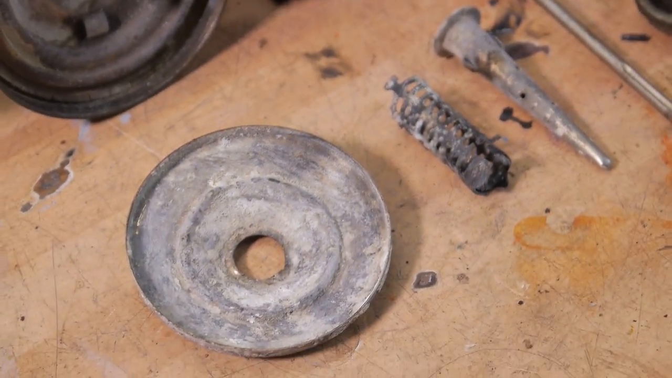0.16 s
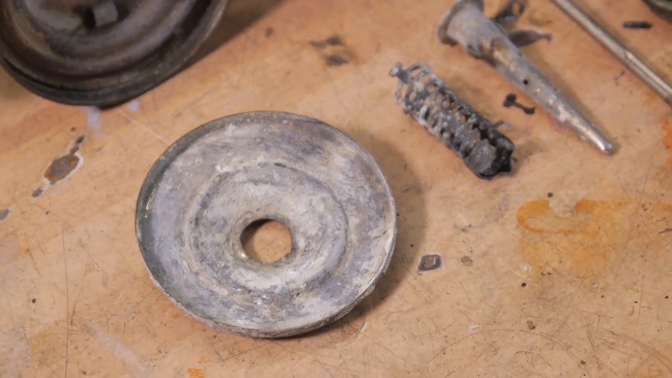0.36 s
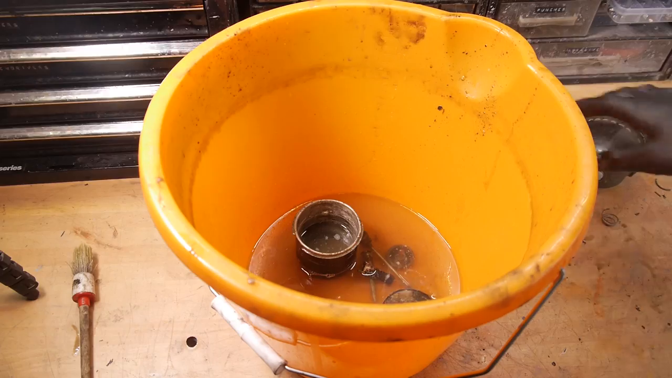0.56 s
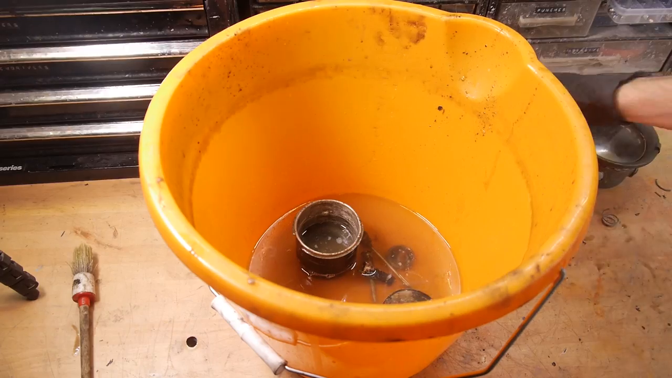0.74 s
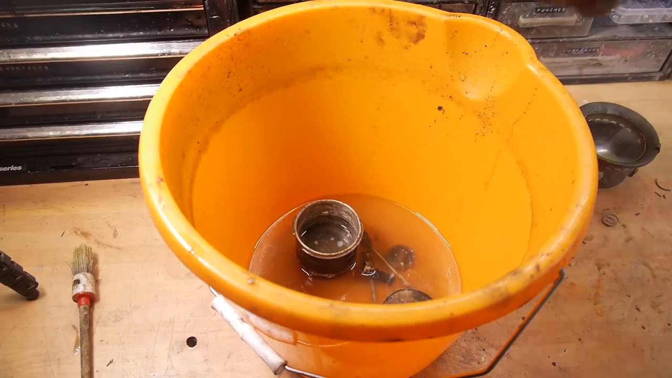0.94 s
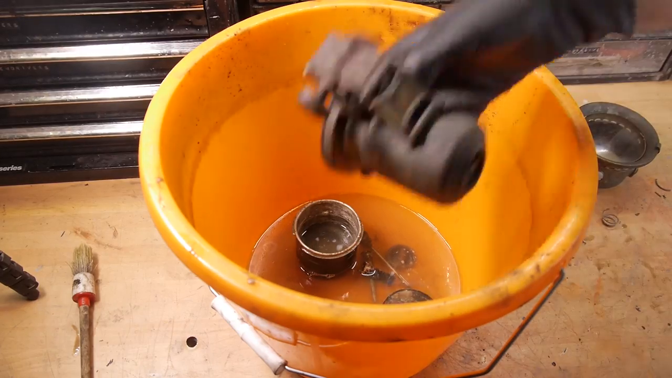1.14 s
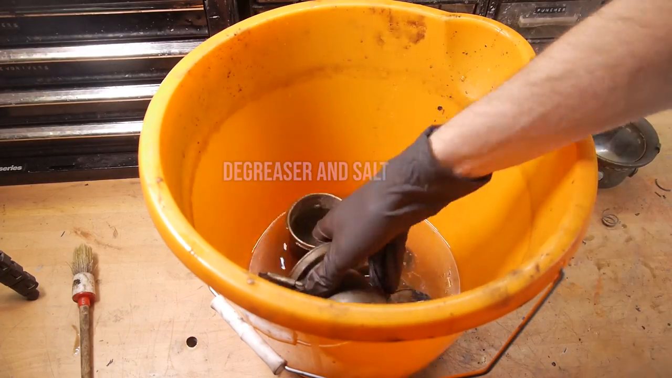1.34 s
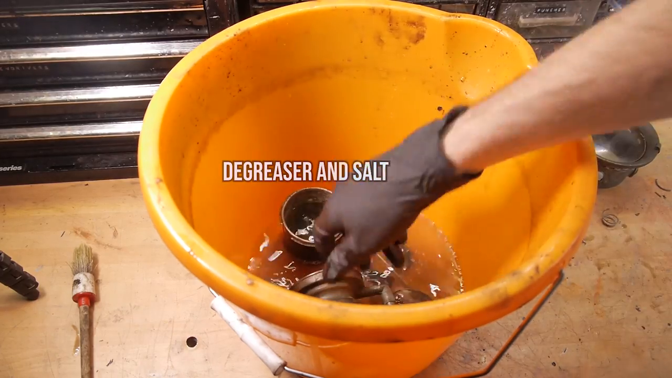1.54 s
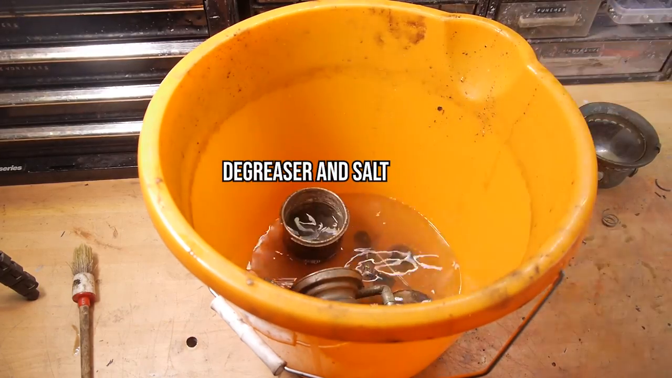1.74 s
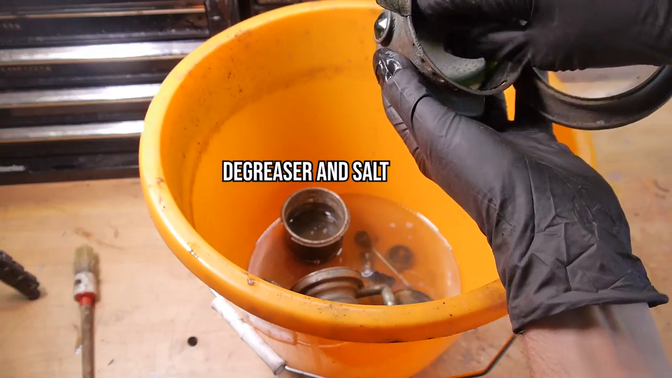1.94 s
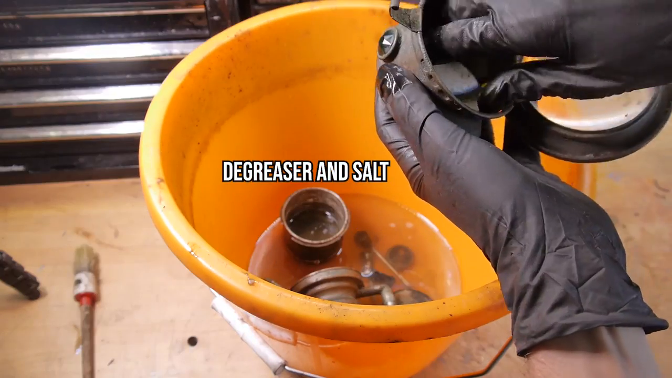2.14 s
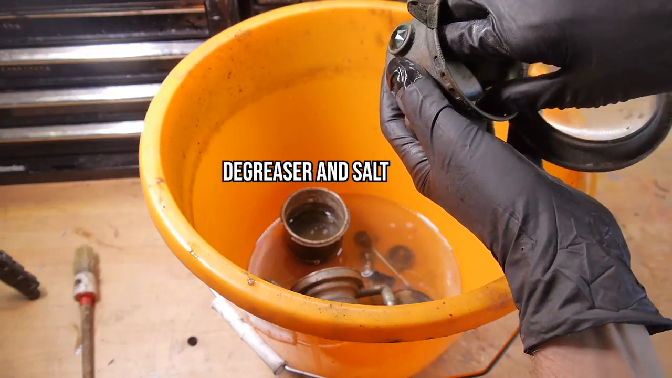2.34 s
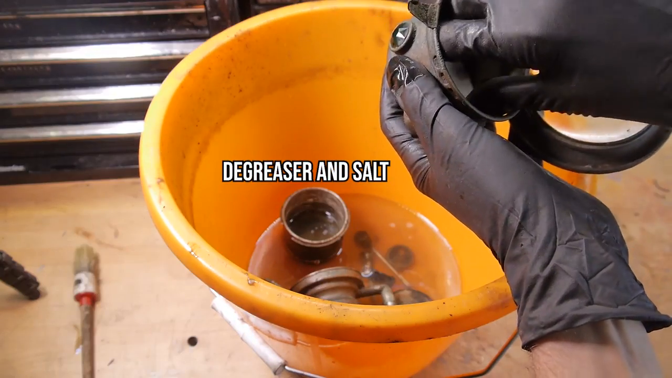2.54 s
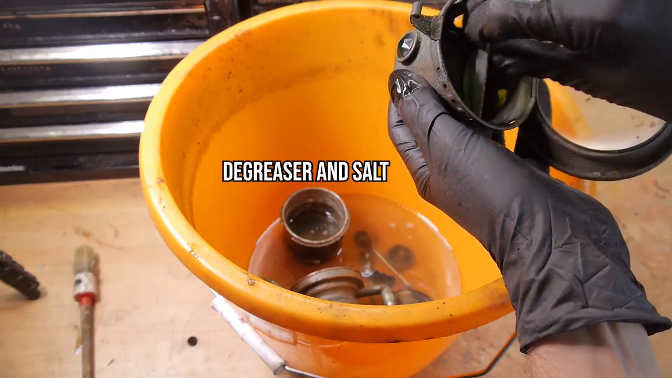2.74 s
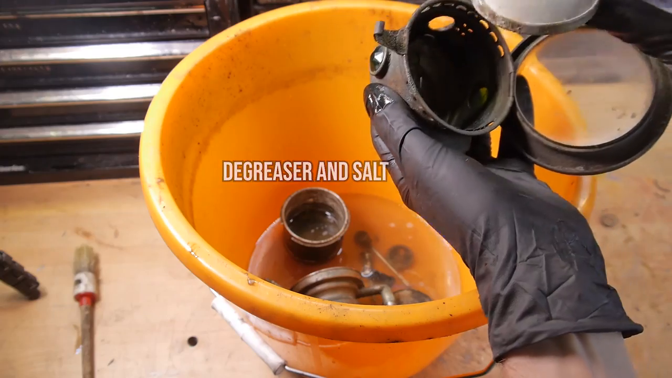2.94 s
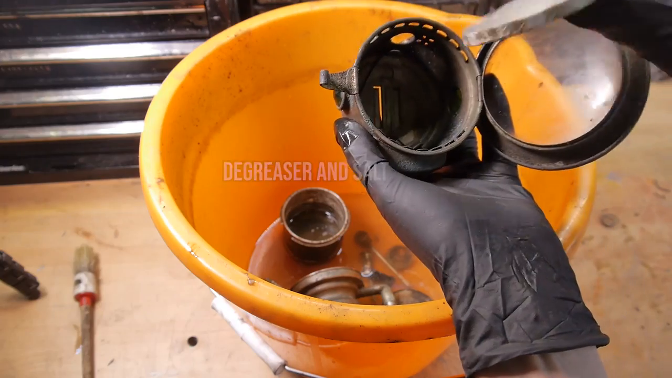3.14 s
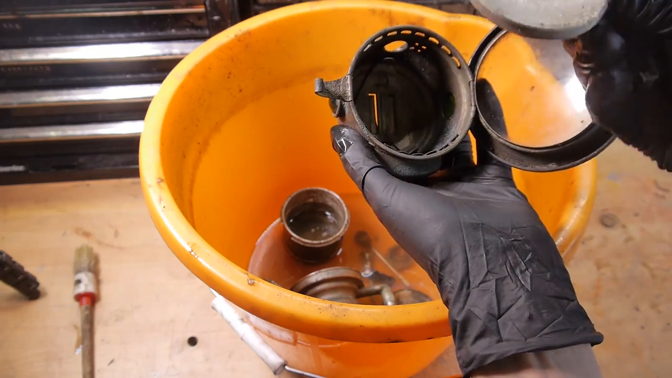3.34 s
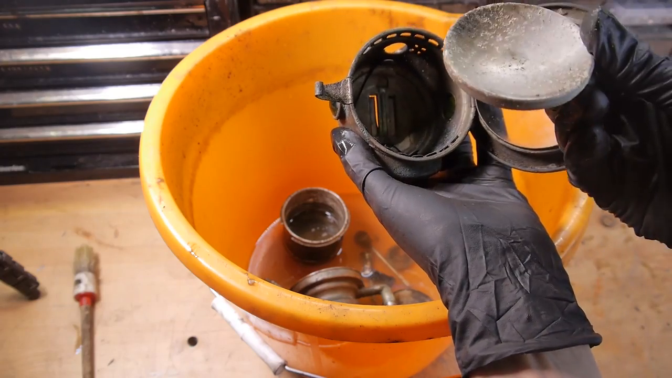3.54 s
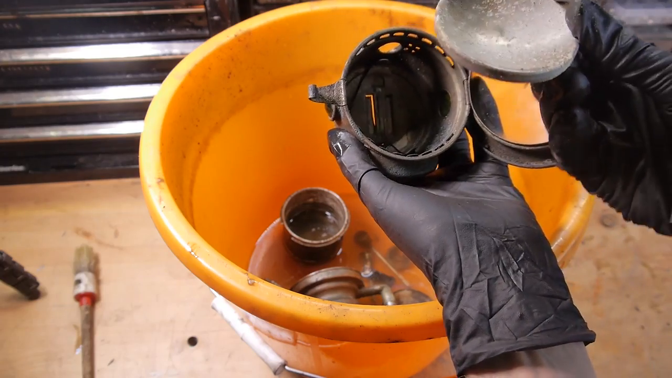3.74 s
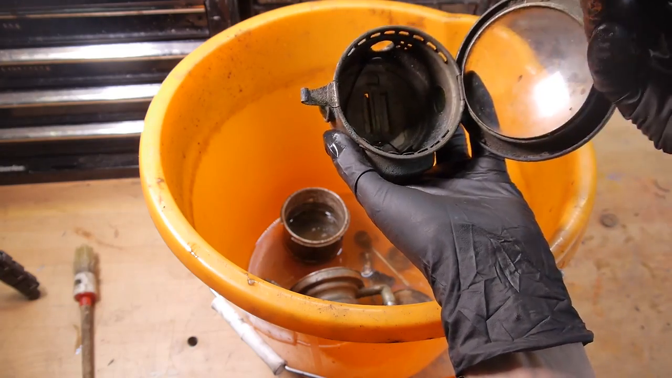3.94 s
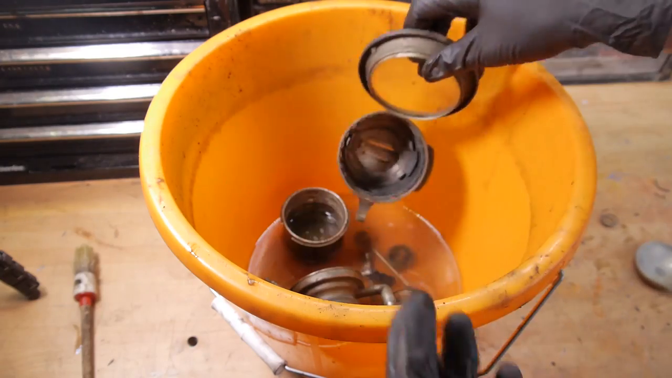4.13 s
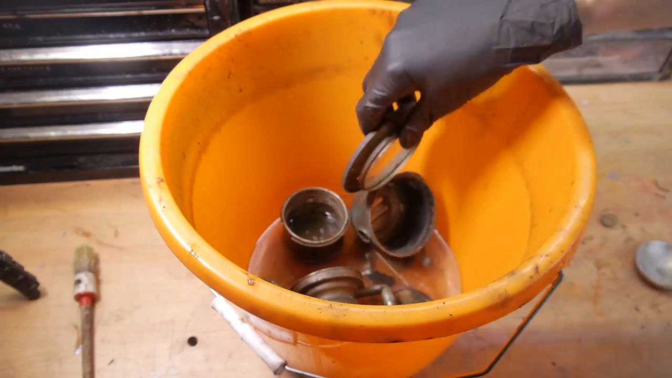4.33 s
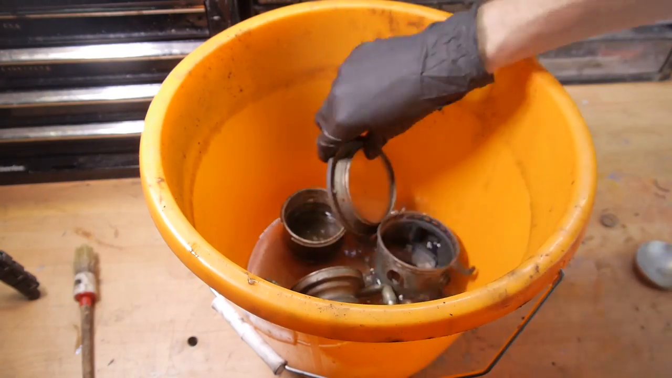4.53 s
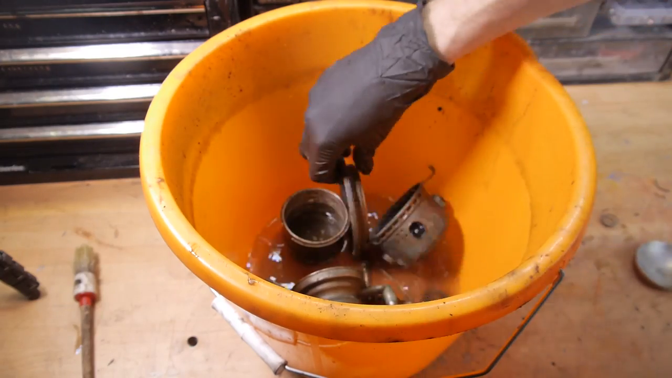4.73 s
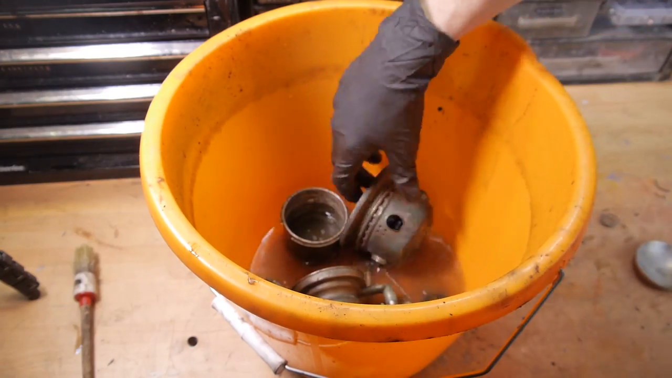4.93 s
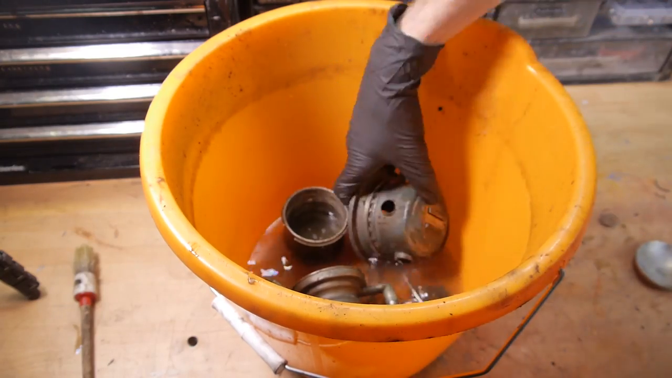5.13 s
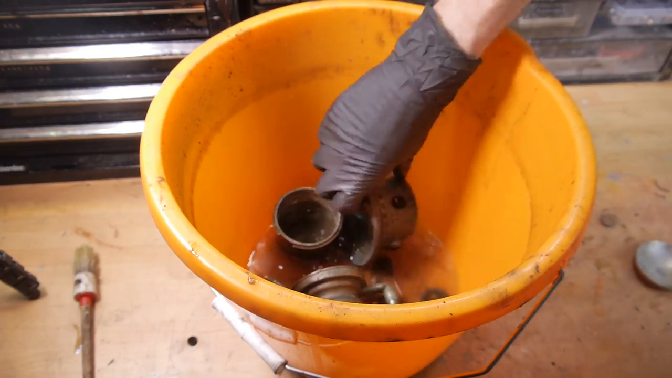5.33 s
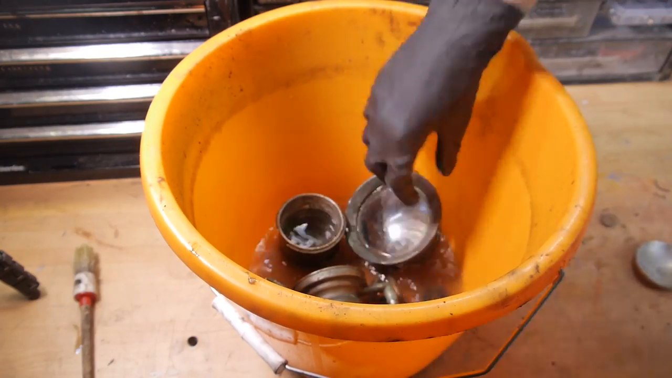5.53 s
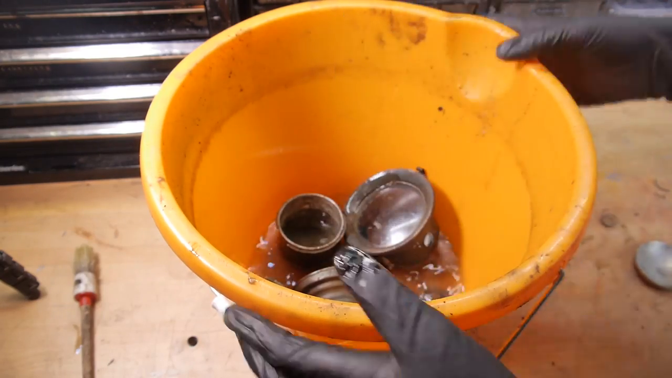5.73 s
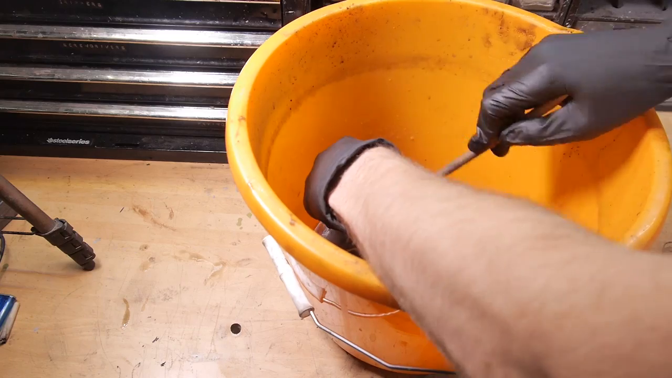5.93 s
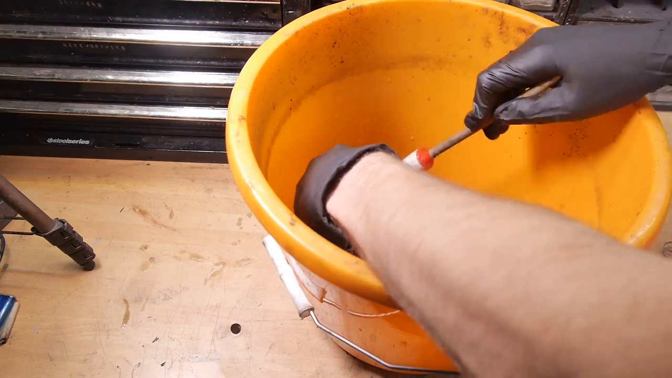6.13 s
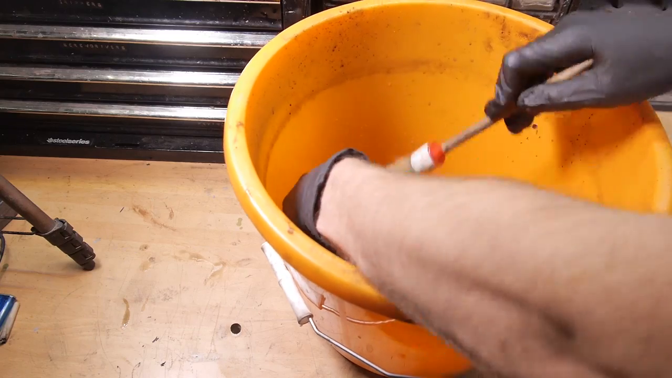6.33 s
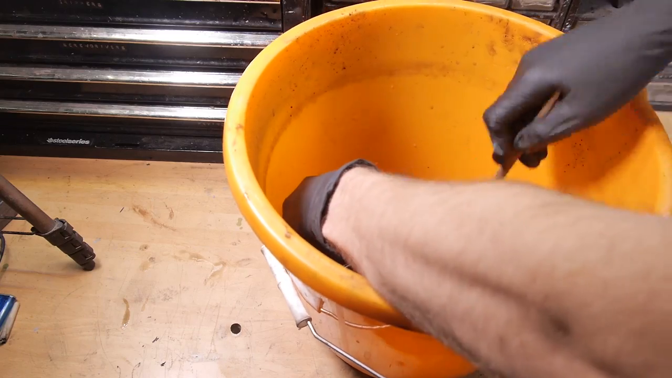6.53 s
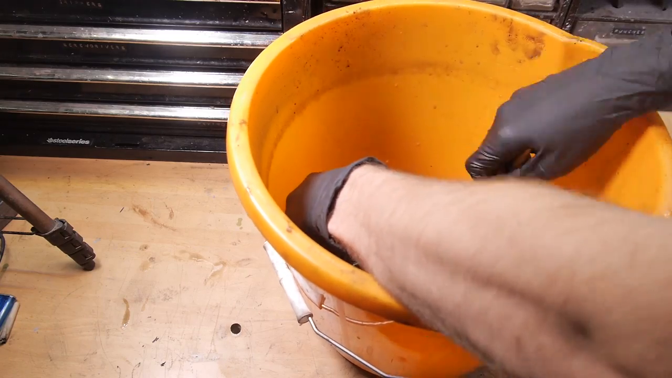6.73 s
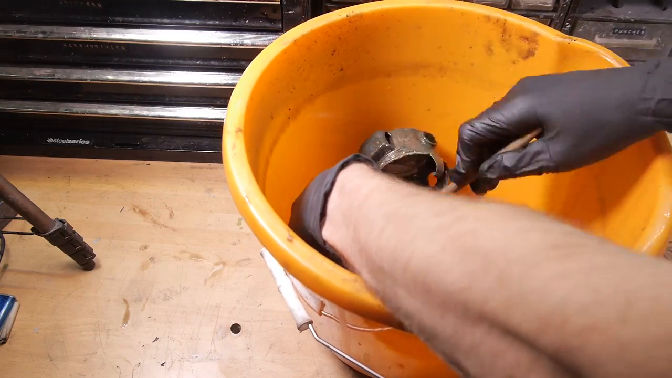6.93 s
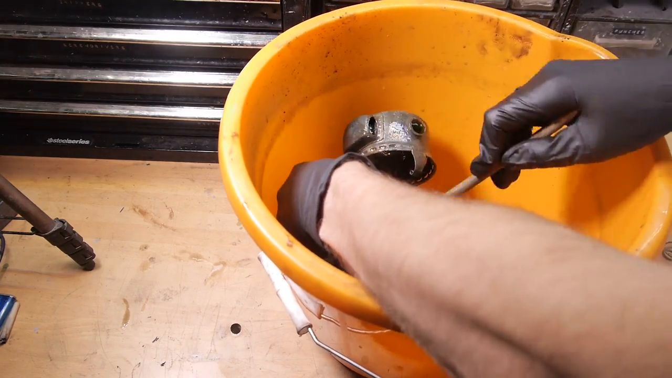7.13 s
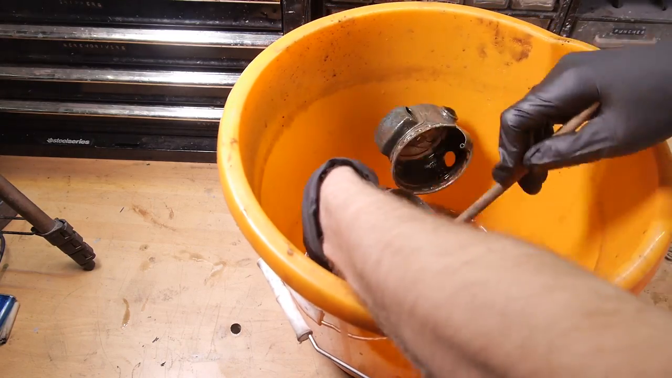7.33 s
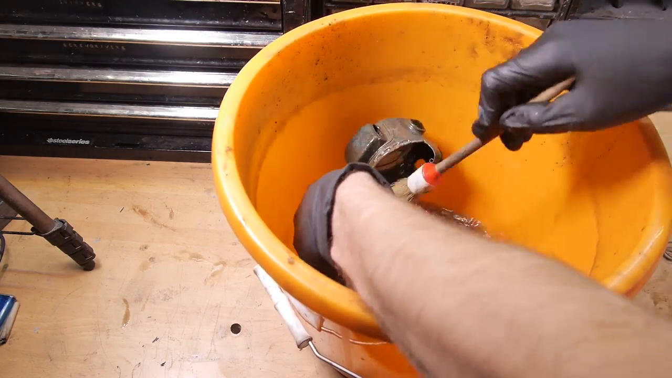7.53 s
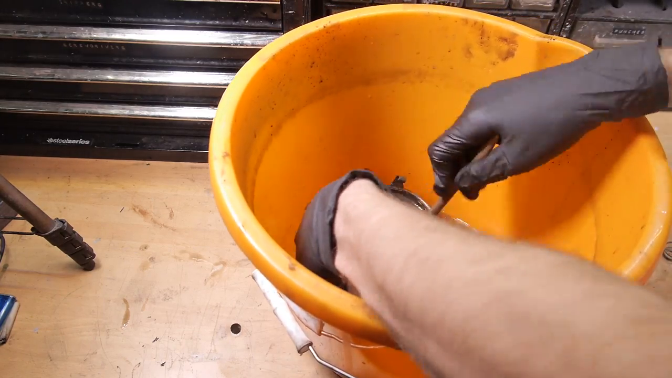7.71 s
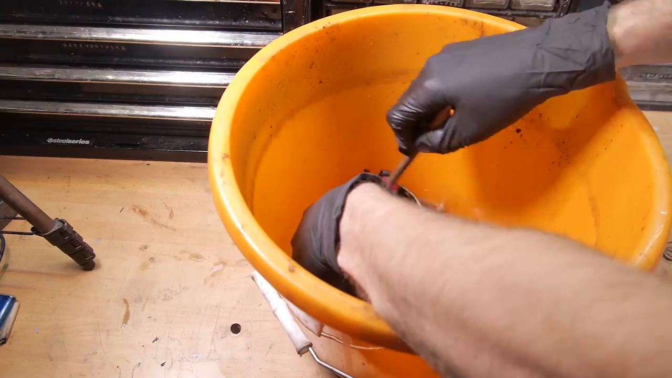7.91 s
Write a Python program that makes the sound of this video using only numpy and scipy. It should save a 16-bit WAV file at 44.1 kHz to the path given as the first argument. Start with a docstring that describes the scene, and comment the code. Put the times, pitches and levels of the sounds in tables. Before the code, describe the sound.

In a small quiet workshop, a dull hum gives way to soft air. Metal lamp parts clank into a plastic bucket with hollow thuds. Gloved hands unclip a lamp with small clicks and pings, then drop its pieces in with a louder, longer clatter and a slight fizz of liquid. Finally a brush scrubs wet metal in fast motion, a bright grainy hiss with quick high taps. Close stereo microphone, little room reflection.

```python
"""A dull hum comes first and gives way to soft workshop air, over a low rumble: filtered noise.
Metal lamp parts then clatter into a plastic bucket with a little cleaning liquid, on a workbench:
noise bursts for the clanks, decaying sines for ringing steel and hollow thuds. Gloved hands unclip
a lamp with clicks and pings. Last, a small brush scrubs the wet lamp body in fast motion:
grainy hiss and quick taps, with the body resonances about five times higher and shorter."""
import sys
import numpy as np
from scipy import signal
from scipy.fft import rfft, irfft, next_fast_len
from scipy.io import wavfile

SR = 44100
rng = np.random.default_rng(int(sys.argv[2]) if len(sys.argv) > 2 else 0)


def transcribe(u):
    """Save the signal u as a 16-bit wav file named by the first command-line argument.

    u: samples, shape (n,) or (channels, n), limited to [-1, 1]; the rate is SR.
    q: integer samples, one column per channel.
    """
    v = np.clip(np.atleast_2d(u).T, -1, 1)
    q = np.round(v * 32767).astype(np.int16)
    wavfile.write(sys.argv[1], SR, q)


N = 355887

# Levels are the balance going in, ahead of each layer's trim; spectra and modes are relative.
# Resonances are listed at speed 1; speed multiplies their pitch and divides their decay time.

# parts knocking in the bucket:
# (time [s], clank level [dB], ring [Hz], tilt [dB per octave], bucket thud level [dB])
KNOCKS = [(1.386, -34, 2860, 0.5, -44.5), (1.4081, -42, 3430, -5, -41), (1.44, -48, 3320, 11, -43),
          (1.4705, -32.5, 3430, 1.5, -25.5), (1.4772, -32, 3720, -10, -42), (1.5315, -37, 3340, -4, -34.5),
          (1.5693, -33, 3660, -4, -32.5), (1.5783, -27, 3380, -5.5, -40), (1.5874, -26, 3320, -3.5, -25),
          (1.6085, -37, 2500, -7, -30.5), (4.4111, -43.5, 2300, 1.5, -43.5),
          (4.442, -26.5, 2360, -2.5, -33.5), (4.45, -32.5, 3450, 3.5, -38), (4.492, -30.5, 3113, 1, -40.5),
          (4.514, -28.5, 1560, 1, -29.5), (4.5586, -31.5, 1520, -2, -44), (4.5959, -27.5, 1800, 1, -30.5),
          (4.6133, -33, 2990, 2, -40), (4.6788, -32, 3140, 0.5, -47), (4.7176, -31, 2700, 2, -36.5),
          (4.7525, -31, 4800, 3.5, -35), (4.7838, -37.5, 4400, 4, -60), (4.8382, -37, 1780, 5, -41),
          (4.8672, -30, 4000, -2, -40), (4.8779, -27.5, 3330, 1, -43), (4.8905, -18.5, 2040, -4.5, -38.5),
          (4.9028, -37.5, 2960, 0, -43), (4.9215, -24, 3730, -2.5, -36.5), (4.9332, -35.5, 3060, 0.5, -54),
          (5.004, -28.5, 1960, -0.5, -37.5), (5.0281, -34, 2080, 1.5, -44),
          (5.103, -26.5, 2170, -3.5, -45.5), (5.1488, -35.5, 2080, -3.5, -40.5),
          (5.1699, -15, 2780, -0.5, -36.5), (5.1849, -15.5, 2206, -1.5, -35.5),
          (5.1975, -19.5, 1680, -3.5, -35), (5.2165, -23.5, 3670, -1, -38.5), (5.2724, -45, 3970, 0, -40),
          (5.2923, -35.5, 3750, 1, -60), (5.3113, -34, 3540, 3, -58), (5.348, -19, 2270, -2.5, -39.5),
          (5.366, -43, 2393, 5, -28), (5.3733, -29, 4030, 5.5, -36), (5.3941, -32, 5006, 2, -31),
          (5.407, -13.5, 1510, -2, -33.5), (5.4567, -30, 3700, 0.5, -54), (5.5017, -36, 3610, -5, -41),
          (5.5576, -33, 5980, 3.5, -50), (5.6293, -55.5, 1370, 4, -54.5), (5.701, -53.5, 1250, 0, -59),
          (5.8146, -45, 3490, 0, -58.5)]
# a firm knock is over quickly, a light one skids on for longer
KNOCK_T60_S, FIRM_KNOCK_DB, SKID_DB_PER_DB = 0.056, -29.5, 0.6456
# parts shoved through the liquid: (start [s], length [s], scrape level [dB], bucket level [dB])
SHOVES = [(1.39, 0.097, -42, -49.5), (1.53, 0.068, -45.5, -56), (4.44, 0.2, -41, -49),
          (4.7, 0.064, -43.5, -43.5), (4.84, 0.093, -40.5, -49), (5.0, 0.13, -49, -54.5),
          (5.15, 0.088, -39.5, -46.5), (5.27, 0.065, -54, -57), (5.33, 0.062, -35.5, -42),
          (5.43, 0.078, -42.5, -45.5), (5.52, 0.073, -53, -62), (5.63, 0.13, -74, -65)]
SHOVE_ATTACK_S, SHOVE_RELEASE_S = 0.0031, 0.02
# small contacts within a shove:
# (rate [per s], hiss over the pressure [dB], thud over the pressure [dB], spread [dB])
RATTLE = (26, 2.1, 2.5, 2.6)
RATTLE_RING_HZ, RATTLE_RING_OCTAVES = 2920, 0.55   # centre, and reach to either side
# bucket base and wall: (frequency [Hz], level [dB], t60 [s])
BUCKET_MODES = [(145, -42, 0.21), (242.6, -23, 0.16), (290, -21, 0.09), (342.4, -20, 0.13),
                (395, -14, 0.092), (452.7, -9.5, 0.097), (501, -5, 0.086), (552, -6.5, 0.089),
                (579, 0.5, 0.087), (619, -2, 0.062), (649.6, 1.5, 0.082), (680, -8.5, 0.092),
                (808, -12.5, 0.077), (1005, -23.5, 0.22)]
# thin steel shells, damped by hand and liquid: (frequency [Hz], level [dB], t60 [s])
STEEL_MODES = [(1393, -2, .13), (1630, -1, .13), (1823, 0, .16), (1898, -1, .12), (2244, 1, .2),
               (2394, -2, .12), (2709, -4, .17), (2924, 0, .14), (3327, -3, .18), (3619, -6, .17),
               (4087, -7, .13), (4990, -10, .1), (5870, -13, .12), (7860, -16, .1)]
# steel parts clanking and scraping: (frequency [Hz], density [dB per Hz])
CLANK_SPECTRUM = [(530, -51), (900, -9), (1280, -12.5), (1420, -5), (2040, -5.5), (2250, -1.5),
                  (2500, -6.5), (2930, -2.5), (7060, -12.5), (7960, -12.5), (8980, -19), (15100, -30),
                  (16000, -48)]
# hollow of the bucket under a soft, spread-out rub: (frequency [Hz], density [dB per Hz])
HOLLOW_SPECTRUM = [(200, -35), (240, -9.5), (380, -15), (480, -8), (540, -6), (580, 12), (650, 7.5),
                   (720, -3), (900, -39.5), (3000, -60.5)]

FAST_MOTION = 4.892   # speed of the scrubbing
# brush and lamp tapping in the bucket:
# (time [s], clank level [dB], ring [Hz], tilt [dB per octave], bucket thud level [dB])
TAPS = [(6.176, -58, 4400, -5, -34.5), (6.1848, -35.5, 9750, 2, -63), (6.282, -42, 4320, -3, -32),
        (6.3698, -27.5, 7540, 4, -36.5), (6.4066, -36.5, 9550, 2, -34.5), (6.446, -40, 11100, 5, -40),
        (6.5623, -41, 8300, 5, -31), (6.5896, -27.5, 10620, -6.5, -32), (6.805, -23, 8100, 0.5, -33.5),
        (6.8173, -34, 8350, 3, -39.5), (6.871, -22.5, 11120, 2, -38), (6.881, -42, 8650, -2, -32.5),
        (6.8922, -35, 11100, 2, -35.5), (7.001, -42, 11070, -3, -41.5), (7.0348, -34, 8840, 0, -42),
        (7.08, -38, 14800, -2, -42), (7.1253, -37, 13500, 5, -43.5), (7.1452, -37, 7640, -5, -46),
        (7.213, -61, 7650, -3, -45.5), (7.238, -54, 8000, -2, -40), (7.2499, -32, 13100, 4, -51),
        (7.2724, -35.5, 13360, 3, -38.5), (7.294, -38, 8650, -4, -36.5), (7.3093, -32, 12730, 12, -58),
        (7.3546, -24, 8000, 1.5, -36), (7.3988, -32, 13870, 3, -42.5), (7.433, -34.5, 4270, 1, -38.5),
        (7.472, -34, 4300, 5, -32), (7.4916, -36, 8000, 12, -30.5), (7.5136, -28, 13200, -2, -40.5),
        (7.5338, -33, 12200, -2, -41), (7.575, -50, 8000, -6, -40), (7.62, -29.5, 12730, 4, -39),
        (7.6408, -30.5, 13360, 2, -38.5), (7.6723, -30.5, 12130, 4, -43), (7.686, -33, 11600, 3, -47),
        (7.7115, -27.5, 7940, 3.5, -41), (7.7608, -24.5, 7170, 5, -39.5), (7.8269, -30.5, 7334, -4, -35.5),
        (7.9218, -27, 12700, -2, -31.5), (7.9766, -27.5, 14600, -1, -39), (8.0055, -43, 11300, -1, -33),
        (8.0307, -32, 11560, -8, -31.5)]
TAP_T60_S = 0.021
# brush strokes on wet metal: (start [s], length [s], hiss level [dB], bucket level [dB])
STROKES = [(5.84, .11, -57, -64), (5.96, 0.13, -56, -67.5), (6.15, .18, -54.5, -55),
           (6.365, 0.031, -51.5, -51.5), (6.43, 0.097, -55.5, -57.5), (6.64, 0.093, -56, -54),
           (6.8, .17, -53, -52), (6.98, 0.064, -55, -55), (7.2, 0.1, -60, -56.5),
           (7.415, 0.15, -54.5, -57.5), (7.62, 0.12, -53.5, -57), (7.775, 0.03, -48.5, -48),
           (7.82, 0.2, -47.5, -47.5)]
STROKE_ATTACK_S, STROKE_RELEASE_S = 0.003, 0.026
# between strokes the bristles stay on the metal: (hiss level [dB], bucket level [dB])
RESTING_DB = (-58.5, -61.5)
# tufts of bristles letting go:
# (rate [per s], hiss over the pressure [dB], thud over the pressure [dB], spread [dB])
FLICKS = (95, 7, 4.6, 7.5)
# firm pressure makes flicks grow faster than the hiss: extra dB per dB
FIRM_BRUSH_DB, FLICK_GROWTH = -54, 0.35
CONTACT_JITTER = 0.45   # share of the interval between flicks, and between rattles
# the brushed lamp rings higher as it is turned and lifted out of the liquid: (time [s], ring [Hz])
LAMP_RING = [(6.0, 9560), (6.6, 10900), (7.3, 12900)]
LAMP_RING_OCTAVES = 0.2   # reach to either side
# lamp body and bucket tapped: (frequency [Hz], density [dB per Hz])
TAP_SPECTRUM = [(3000, -33), (3800, -13.5), (4400, -0.5), (5200, -2), (6400, -5), (7600, 4.5), (9200, 1),
                (11300, 0.5), (13500, 3), (15500, 2), (17000, -25)]
# bristles on wet metal: (frequency [Hz], density [dB per Hz])
BRISTLE_SPECTRUM = [(700, -10.5), (1200, 0), (2000, -3), (3500, 0.5), (5800, -3), (7700, 4.5), (9000, 0),
                    (11000, 5), (13000, -7), (15600, 4), (17000, -47)]

# catch and hinge of the lamp in the hands:
# (time [s], click level [dB], t60 [s], ring [Hz], tilt [dB per octave])
CATCHES = [(2.0589, -32, 0.023, 4530, -2.5), (2.194, -52, .077, 1950, 5.5), (2.275, -49, .124, 4680, 8.5),
           (2.342, -49, 0.061, 4600, 1), (2.4115, -52.5, 0.15, 4780, 3), (2.5208, -49.5, .2, 4390, 2),
           (2.533, -34, 0.041, 4670, 1), (2.5667, -32.5, 0.073, 4820, 6), (2.741, -43.5, 0.2, 4520, 1.5),
           (2.8215, -29.5, .042, 3660, 0), (2.8307, -36.5, 0.065, 4740, 3.5), (2.874, -50, .092, 4490, 5.5),
           (2.92, -44.5, 0.027, 2250, -2.5), (2.9293, -49, .035, 2330, -1),
           (4.1785, -45.5, 0.087, 4690, -2.5)]
# catch and hinge clicking: (frequency [Hz], density [dB per Hz])
CATCH_SPECTRUM = [(290, -59), (500, -19), (659, -16), (1460, -15), (2460, -6), (2690, -0.5), (3540, -5.5),
                  (4800, -4.5), (6140, -4), (14000, -14.5), (16000, -29)]
# shell of the lamp in the hands: (frequency [Hz], level [dB], t60 [s])
SHELL_MODES = [(617, -7, 0.052), (1360, -19, 0.037), (2260, -4, .05), (4540, -6, 0.07), (4880, 1.5, 0.077),
               (5500, -10, .12), (7840, 3, .045)]
# rubber gloves sliding off the metal: (time [s], level [dB])
GLOVE_LEVEL = [(4.0, -85), (4.04, -58.5), (4.12, -65), (4.17, -63), (4.21, -58), (4.3, -80)]
# rubber on metal: (frequency [Hz], density [dB per Hz])
GLOVE_SPECTRUM = [(880, -42.5), (1500, -19.5), (1710, -5), (1880, -23.5), (2120, -9), (2880, -6),
                  (3410, 3.5), (3920, -12), (8080, -12.5), (16000, -25)]

# the heavy lamp body landing on the bucket's floor: (time [s], peak level [dB])
LANDINGS = [(1.399, -46), (1.476, -42.5), (1.572, -55), (1.589, -38.5)]
# bench top under the bucket: (frequency [Hz], level [dB], t60 [s])
BENCH_MODES = [(210, -7, 0.1), (240, 8, .11), (285, 1, 0.048), (376, 1, .06)]
# liquid stirred up by the hand: (start [s], length [s], level [dB])
SLOSHES = [(4.45, 0.373, -60), (5.14, 0.444, -56)]
SLOSH_ATTACK_S, SLOSH_RELEASE_S = 0.014, 0.027
# fizzing liquid: (frequency [Hz], density [dB per Hz])
SLOSH_SPECTRUM = [(3000, -11), (5000, -2), (8000, 2), (11000, -5.5), (15000, -10), (16500, -31)]
# one part sings on: (start [s], frequency [Hz], level [dB], t60 [s])
AFTER_RING = (5.5, 598.5, -64, 2.3)

# quiet workshop air: (time [s], level [dB])
AIR_LEVEL = [(.59, -67), (.62, -55.5), (.9, -53.5), (1.3, -58), (1.85, -59), (2.0, -54.5), (2.2, -59),
             (2.9, -60), (3.5, -65), (4.4, -64), (5.8, -62.5), (5.9, -75), (8.07, -75)]
# soft air: (frequency [Hz], density [dB per Hz])
AIR_SPECTRUM = [(53, -48), (90, -18.5), (244, -4), (385, -3), (457, 0), (876, -5), (1610, -5),
                (3910, -11.5), (5300, -13), (7170, -17), (8170, -14.5), (15000, -27.5), (16000, -44.5)]
# low rumble: (frequency [Hz], density [dB per Hz])
RUMBLE_SPECTRUM = [(15, -2.5), (30, -3), (60, -8), (140, -7.5), (250, -10.5), (500, -26)]
# dull opening hum: (frequency [Hz], density [dB per Hz])
HUM_SPECTRUM = [(70, -14), (140, -1), (260, 2.5), (400, -4.5), (700, -5.5), (1500, -9), (3000, -11.5),
                (5400, -15.5), (8000, -25.5), (15000, -44)]
RUMBLE_DB, HUM_DB, HUM_END_S = -71, -59, 0.6
# width of the stereo microphone: (frequency [Hz], side gain [dB])
WIDTH = [(20, -13), (120, -11.5), (300, -5), (600, -4.5), (1200, 0.5), (2500, -4), (5000, -0.5), (12000, 1)]
SIDE_DB = -11.5   # stereo width of close contacts
ROOM_T60_S = 0.18   # at speed 1
TAIL = 16384   # longest resonance and room tail [samples]
CUTOFF_HZ = 17000


def loading():
    """Parts knock into the bucket, and scrape and rattle as they are shoved into place."""
    pressure = moves(SHOVES, SHOVE_ATTACK_S, SHOVE_RELEASE_S)
    knocks = []
    for s, db, *rest in KNOCKS:
        skid = from_db(SKID_DB_PER_DB * (FIRM_KNOCK_DB - db))
        knocks.append((s, db, KNOCK_T60_S * skid, *rest))
    rattle = flicks(pressure, *RATTLE, t60=0.043, ring=[(0, RATTLE_RING_HZ)],
                    octaves=RATTLE_RING_OCTAVES, tilt_db=1)
    clatter = blows(np.vstack([knocks, rattle]), CLANK_SPECTRUM, 0.97, clank_db=-1.58, steel_db=-11.5,
                    ping_db=-6.5, thud_db=0.1, ring_db=6, crack=1.0, rise_s=0.00034)
    slips = grains(1200, 4.0, smooth=0.54)
    return clatter + rubbing(pressure, CLANK_SPECTRUM, 1.0, slips,
                             scrape_db=-4.5, body_db=-4.5, patchy_db=-1.5)


def scrubbing():
    """The brush hisses and flicks over the lamp, which taps against the bucket; all in fast motion."""
    started = np.arange(N) > STROKES[0][0] * SR
    resting = from_db(RESTING_DB)[:, None] * started
    pressure = np.maximum(moves(STROKES, STROKE_ATTACK_S, STROKE_RELEASE_S), resting)
    grip = pressure * (pressure[0] / from_db(FIRM_BRUSH_DB)) ** FLICK_GROWTH
    taps = [(s, db, TAP_T60_S, *rest) for s, db, *rest in TAPS]
    tufts = flicks(grip, *FLICKS, t60=0.022, ring=LAMP_RING, octaves=LAMP_RING_OCTAVES, tilt_db=-0.7)
    tapping = blows(np.vstack([taps, tufts]), TAP_SPECTRUM, FAST_MOTION, clank_db=-2.5, steel_db=-30,
                    ping_db=-3.0, thud_db=-2.0, ring_db=5, crack=1.0, rise_s=0.00021)
    bristles = grains(2500, 4.6, smooth=0.71)
    return tapping + rubbing(pressure, BRISTLE_SPECTRUM, FAST_MOTION, bristles,
                             scrape_db=-1.24, body_db=-9, patchy_db=3)


def blows(rows, spectrum, speed, clank_db, steel_db, ping_db, thud_db, ring_db, crack, rise_s):
    """Steel hits steel and the bucket under it: a clank, a short metal ring and a hollow thud."""
    out = np.zeros((2, N))
    bucket = mode_shapes(BUCKET_MODES, speed, rise_s=0.0013)
    steel = mode_shapes(STEEL_MODES, speed, rise_s=0.00038)
    thud_size = np.sqrt(0.01 * SR / speed)   # energy of a 10 ms blow at speed 1
    for s, db, t60, ring_hz, tilt_db, bucket_db in rows:
        hit = from_db(db + clank_db) * clank(spectrum, t60, ring_hz, tilt_db, ring_db, crack, rise_s)
        ring = from_db(steel_db) * strike(steel, uneven=0.86, together=0.19)
        ring = ring + from_db(ping_db) * ping(ring_hz, 0.042 / speed, spread=0.064)
        thud = from_db(bucket_db + thud_db) * thud_size * strike(bucket, uneven=0.48, together=0.32)
        add(out, s, hit)
        add(out, s, np.linalg.norm(hit[0]) * ring)
        add(out, s + 0.001 / speed, thud)   # the soft plastic gives way a moment later
    return out


def clank(spectrum, t60, ring_hz, tilt_db, ring_db, crack, rise_s):
    """A contact builds up, then chatters out into the dense modes of a part, strongest near its ring."""
    size = 2 * next_fast_len(int(max(t60, 0) * SR / 2) + 512)
    t = np.arange(size) / SR
    dying = from_db(-60 * t / max(t60, 0.005))   # short for a tap, long for a scrape
    onset = (1 + crack * np.exp(-t / 0.00088)) * (1 - np.exp(-(t / rise_s) ** 2))
    chatter = wide_noise(size, SIDE_DB) * dying * onset
    ring = ring_db * np.exp(-0.5 * ((log_hz(size) - np.log2(ring_hz)) / 0.19) ** 2)
    tilt = tilt_db * np.maximum(log_hz(size) - np.log2(1000), 0)
    coloured = colour(chatter, shape_db(spectrum, size) + ring + tilt)
    return unit_energy(coloured) * np.sqrt(np.sum(dying ** 2))   # longer contacts carry more energy


def ping(ring_hz, t60, spread, count=3):
    """A round shell rings in a few close modes, which beat."""
    modes = [(hz, 0, t60) for hz in ring_hz * np.exp(spread * rng.uniform(-1.036, 1, count))]
    return strike(mode_shapes(modes, 0.98, rise_s=0.00054), uneven=0.28, together=0.35)


def mode_shapes(modes, speed, rise_s):
    """One decaying sine per mode; the body takes a moment to start swinging."""
    longest = max(t60 for _, _, t60 in modes)
    size = int(min(2 * longest / speed * SR, TAIL))
    t = np.arange(size) / SR * speed
    rise = 1 - np.exp(-t / rise_s)
    shapes = [from_db(db - 60 * t / t60) * np.sin(2 * np.pi * hz * t) * rise
              for hz, db, t60 in modes if hz * speed < SR / 2]
    return np.pad(shapes, [(0, 0), (0, TAIL - size)])


def strike(shapes, uneven, together):
    """A blow drives the modes partly in step, partly with strengths and signs drawn per contact."""
    count = len(shapes)
    signs = rng.choice([-1, 1], count)
    strengths = np.exp(uneven * rng.standard_normal(count))
    return unit_energy((together + signs * strengths) @ shapes)


def rubbing(pressure, spectrum, speed, slips, scrape_db, body_db, patchy_db):
    """Friction hisses on the metal and keeps the bucket murmuring."""
    scrape, body = pressure
    hiss = patchy(bed(slips, spectrum), patchy_db, per_s=25)
    hollow = np.array(HOLLOW_SPECTRUM) * [speed, 1]
    murmur = bed(slips, hollow) * from_db(6.7 * wander(70))
    return from_db(scrape_db) * scrape * hiss + from_db(body_db) * body * murmur


def patchy(x, patchy_db, per_s):
    """As the contact moves over the metal, each half octave swells and fades by itself."""
    centres = np.arange(np.log2(1000), np.log2(SR / 2), 0.5)
    size = 2 * next_fast_len(N // 2 + 1)
    octave = np.clip(log_hz(size), centres[0], centres[-1])
    bins = rfft(x, size)
    total = 0
    for centre in centres:
        band = irfft(bins * np.maximum(1 - 2 * abs(octave - centre), 0))[:, :N]
        total = total + band * from_db(patchy_db * wander(per_s))
    return rms_one(total)


def grains(per_s, spread_db, smooth):
    """Tiny slips of uneven size over smooth friction noise."""
    sizes = from_db(spread_db * np.minimum(rng.exponential(1, N), 4))
    slips = sizes * (rng.random(N) < per_s / SR)
    return (rms_one(slips) + smooth) * wide_noise(N, SIDE_DB)


def moves(rows, attack_s, release_s):
    """Each move of the hand takes hold, stays and lets go; gains of the friction and of the bucket."""
    t, out = np.arange(N) / SR, np.zeros((2, N))
    for start, length, *db in rows:
        i = max(int(start * SR), 0)
        age = t[i:i + SR] - t[i]
        shape = (1 - np.exp(-age / attack_s)) * np.exp(-np.maximum(age - length, 0) / release_s)
        out[:, i:i + SR] = np.maximum(out[:, i:i + SR], from_db(db)[:, None] * shape)
    return out


def flicks(pressure, per_s, hiss_db, body_db, spread_db, t60, ring, octaves, tilt_db):
    """Edges or tufts catch and let go in a loose rhythm, as hard as they are pressed; rows for blows."""
    chance = rng.random((900, 5))
    s = (np.arange(len(chance)) + 1 + CONTACT_JITTER * chance[:, 0]) / per_s
    pressed = pressure[:, np.minimum(s * SR, N - 1).astype(int)]
    hiss, body = 20 * np.log10(pressed + 1e-9)
    force = spread_db * (2 * chance[:, 1] - 1)
    lengths = t60 * (0.5 + chance[:, 2])
    ring_hz = np.interp(s, *np.transpose(ring)) * 2 ** (octaves * (2 * chance[:, 3] - 1))
    tilts = tilt_db * 2 * chance[:, 4]
    rows = np.column_stack([s, hiss + hiss_db + force, lengths, ring_hz, tilts, body + body_db + force])
    return rows[(s < N / SR) & (hiss > -68)]   # none where the pressure is too light


def hands():
    """The lamp's catch clicks, scrapes and pings, and the shell knocks with it; gloves slide over it."""
    out = from_db(-1.0) * gains(GLOVE_LEVEL)[0] * bed(grains(2500, 3.8, smooth=0.7), GLOVE_SPECTRUM)
    shell = mode_shapes(SHELL_MODES, 0.98, rise_s=0.00056)
    for s, db, t60, ring_hz, tilt_db in CATCHES:
        click = from_db(db - 1.0) * clank(CATCH_SPECTRUM, t60, ring_hz, tilt_db,
                                          ring_db=10.5, crack=1.0, rise_s=0.00057)
        ring = from_db(-7.5) * ping(ring_hz, t60 + 0.012, spread=0.0484)
        ring = ring + from_db(-10) * strike(shell, uneven=0.3, together=0.18)
        add(out, s, click)
        add(out, s, np.linalg.norm(click[0]) * ring)
    return out * from_db([[-1.1], [1.1]])   # leans to the right


def bench():
    """Only the heavy body presses through the bucket and thumps the bench."""
    out, shapes = np.zeros((2, N)), mode_shapes(BENCH_MODES, 1, rise_s=0.0016)
    for s, db in LANDINGS:
        thump = strike(shapes, uneven=0.2, together=1.4)
        add(out, s, from_db(db - 0.5) * thump / np.abs(thump).max())
    # the board is too small to radiate deep bass
    return signal.sosfilt(signal.butter(6, 175, "high", fs=SR, output="sos"), out + 1e-18)


def slosh():
    """Stirred liquid fizzes in fine droplets, and settles when the hand stops."""
    stirring = moves(SLOSHES, SLOSH_ATTACK_S, SLOSH_RELEASE_S)[0]
    return stirring * bed(grains(700, 3.4, smooth=0.54), SLOSH_SPECTRUM)


def after_ring():
    """A faint, pure note of a part left free to swing: one decaying sine."""
    s, hz, db, t60 = AFTER_RING
    age = np.maximum(np.arange(N) / SR - s, 0)
    return from_db(db - 60 * age / t60) * np.sin(2 * np.pi * hz * age)


def workshop(x, speed, wet_db):
    """Diffuse reflections of a small room: a decaying noise tail with softened treble."""
    t = np.arange(TAIL) / SR * speed
    envelope = from_db(-60 * t / ROOM_T60_S) * (1 - np.exp(-(t / 0.0012) ** 2))
    tail = wide_noise(TAIL, side_db=-8.5) * envelope
    lowpass = signal.butter(1, min(4500 * speed, 0.45 * SR), fs=SR, output="sos")
    dull = signal.sosfilt(lowpass, tail)
    return x + from_db(wet_db) * signal.fftconvolve(x, unit_energy(dull), axes=1)[:, :N]


def background():
    """A dull hum at first, then soft air that swells and sinks; a low rumble throughout."""
    air = gains(AIR_LEVEL)[0] * bed(wide_noise(N, side_db=-7), AIR_SPECTRUM)
    rumble = from_db(RUMBLE_DB) * bed(wide_noise(N, side_db=-2.0), RUMBLE_SPECTRUM)
    hum = from_db(HUM_DB) * bed(wide_noise(N, side_db=-6), HUM_SPECTRUM)
    return air + rumble + hum * (np.arange(N) < HUM_END_S * SR)


def from_db(db):
    """Decibels to amplitude."""
    return 10 ** (np.asarray(db) / 20)


def rms_one(x):
    """Scale to an rms of 1."""
    return x / np.sqrt(np.mean(x ** 2) + 1e-20)


def unit_energy(x):
    """Scale to a summed square of 1, averaged over the channels."""
    return x / np.sqrt(np.mean(np.sum(x ** 2, axis=-1)) + 1e-20)


def gains(rows):
    """Each dB column as a gain in time, silent outside its span."""
    s, *columns = np.transpose(rows)
    t = np.arange(N) / SR
    return [from_db(np.interp(t, s, column, left=-200, right=-200)) for column in columns]


def log_hz(size):
    """Octave position of each frequency bin."""
    return np.log2(np.maximum(np.arange(size // 2 + 1) * SR / size, 1))


def shape_db(points, size):
    """A spectrum on the bins, falling away below its first point."""
    hz, db = np.transpose(points)
    octaves_below = np.clip(np.log2(hz[0]) - log_hz(size), 0, 4)
    return np.interp(log_hz(size), np.log2(hz), db) - 15 * octaves_below


def colour(x, db):
    """Causal (minimum-phase) filter with the given dB per bin."""
    size = 2 * (len(db) - 1)
    cepstrum = irfft(np.log(from_db(db)))
    cepstrum[1:size // 2] *= 2
    cepstrum[size // 2 + 1:] = 0
    return irfft(rfft(x, size) * np.exp(rfft(cepstrum)))[..., :x.shape[-1]]


def wide_noise(size, side_db):
    """Stereo white noise; side_db sets how far the channels differ."""
    mid, side = rng.standard_normal((2, size))
    return mid + from_db(side_db) * side * [[1], [-1]]


def bed(x, spectrum):
    """A long excitation given a spectrum; rms 1."""
    return rms_one(colour(x, shape_db(spectrum, 2 * next_fast_len(N // 2 + 2000))))


def wander(per_s):
    """Smooth random movement around zero, with a spread of about 1."""
    knots = rng.standard_normal(int(N / SR * per_s) + 2)
    return np.interp(np.arange(N) / SR * per_s, np.arange(len(knots)), knots)


def add(out, s, sound):
    """Mix a sound in at time s."""
    i = max(int(s * SR), 0)
    out[:, i:i + sound.shape[-1]] += sound[..., :max(N - i, 0)]


def scene():
    """Loading and handling at about normal speed, then the scrubbing, in the workshop's air."""
    handling = loading() + slosh() + bench() + hands()
    near = workshop(handling, 0.89, wet_db=-20) * from_db([[-0.15], [0.15]])
    fast = workshop(scrubbing(), FAST_MOTION, wet_db=-22.5) * from_db([[-0.6], [0.6]])
    return near + fast + after_ring() + background()


def record(dry):
    """The microphone pair's width varies with pitch; the top is cut; the converter sits off zero."""
    side = colour((dry[0] - dry[1]) / 2, shape_db(WIDTH, 2 * next_fast_len(N // 2 + 2000)))
    heard = dry.mean(axis=0) + side * [[1], [-1]]
    top_cut = signal.cheby2(14, 45, CUTOFF_HZ, fs=SR, output="sos")
    offset = -0.0028
    return signal.sosfiltfilt(top_cut, heard) + offset


dry = scene()
out = record(dry)
transcribe(out)
```